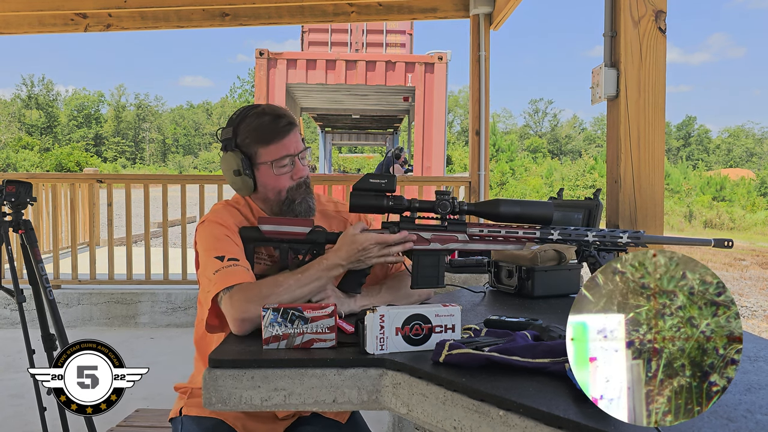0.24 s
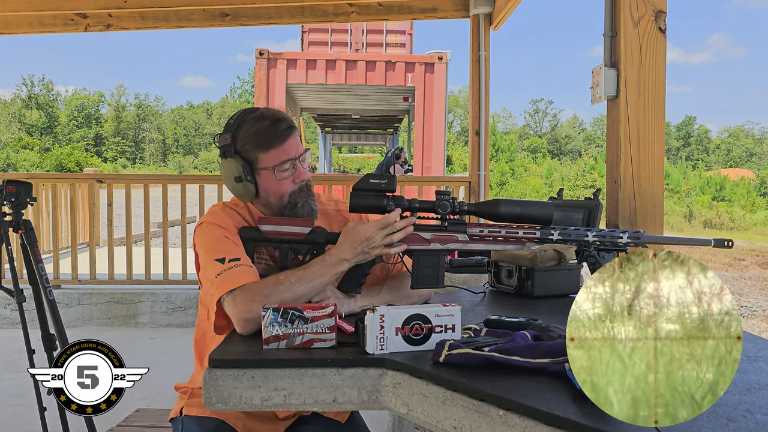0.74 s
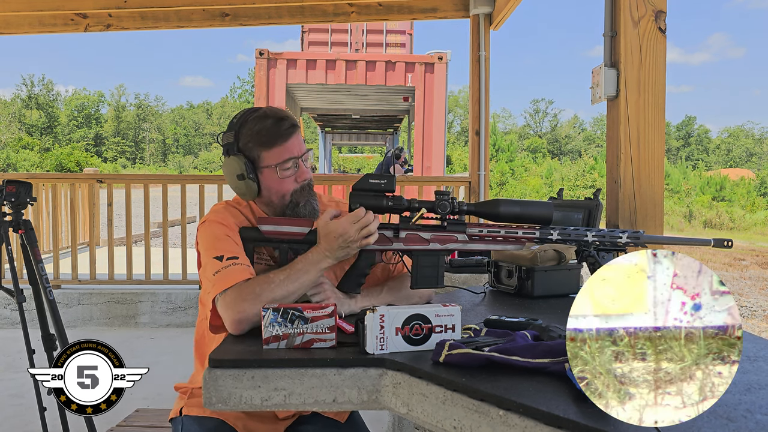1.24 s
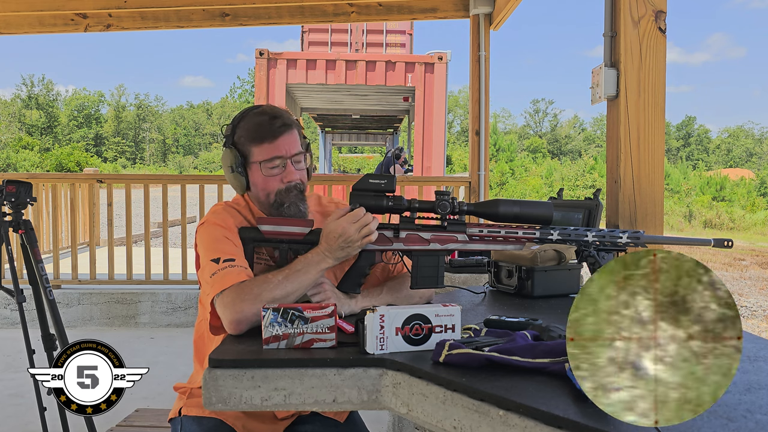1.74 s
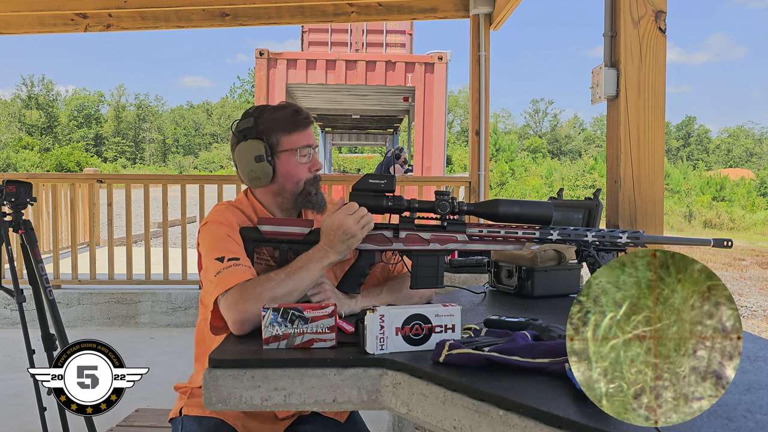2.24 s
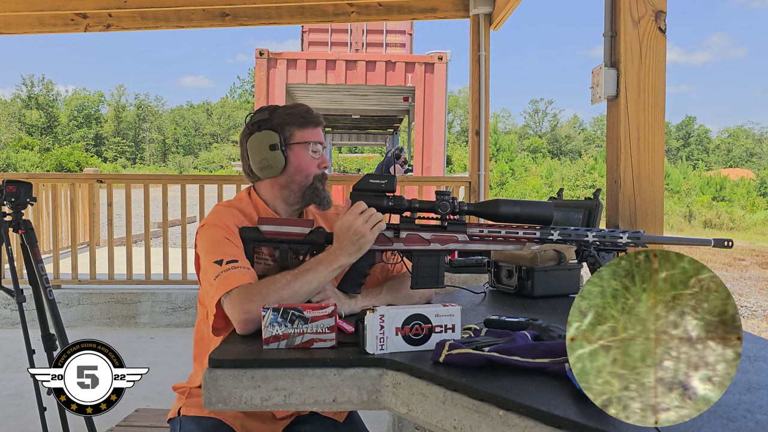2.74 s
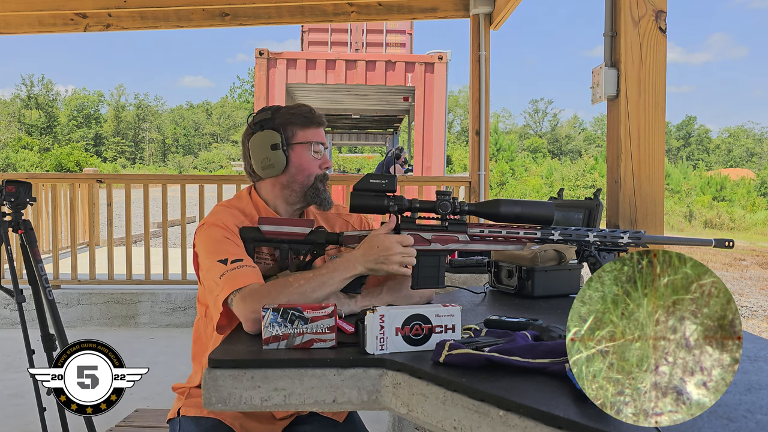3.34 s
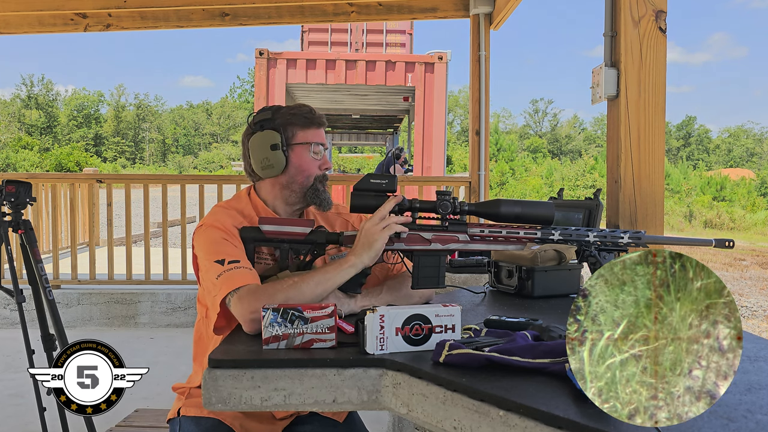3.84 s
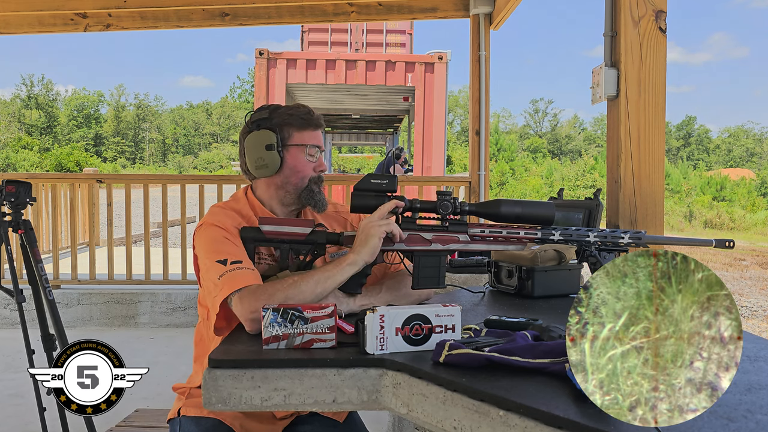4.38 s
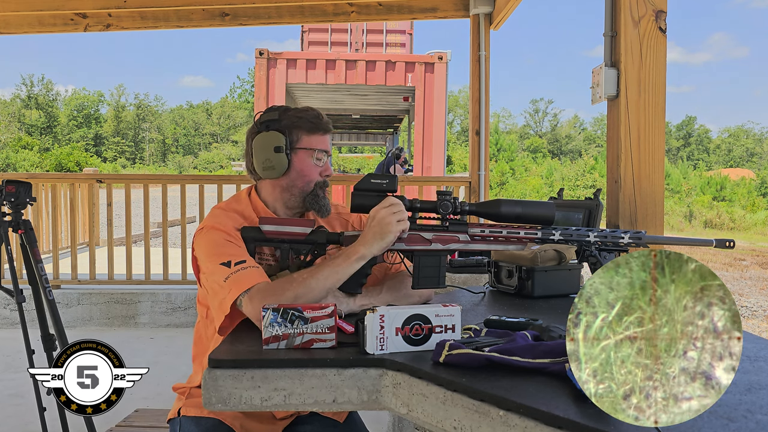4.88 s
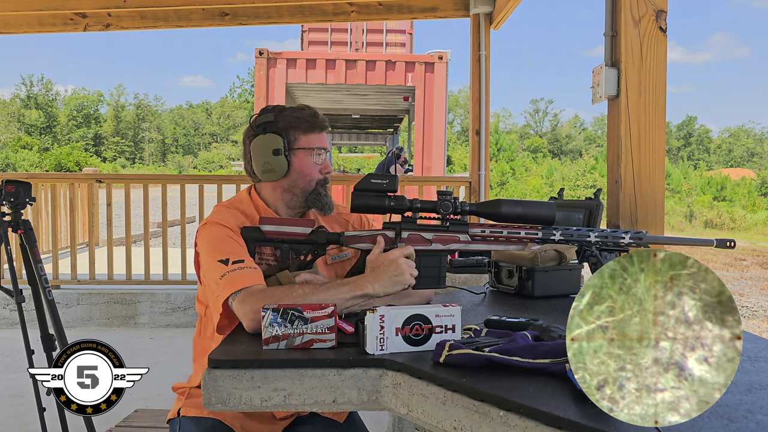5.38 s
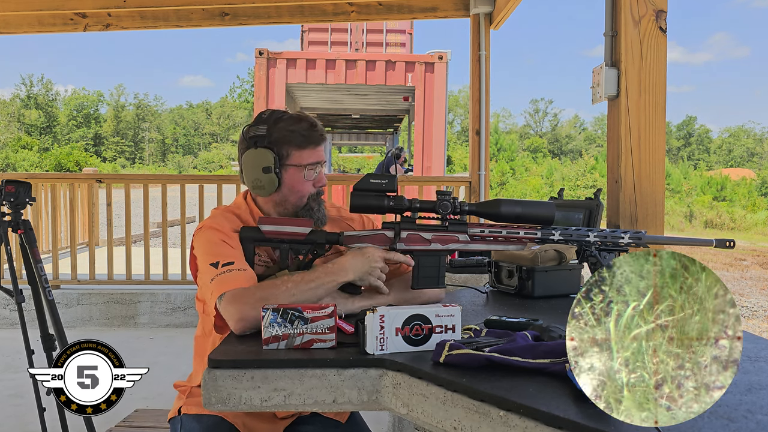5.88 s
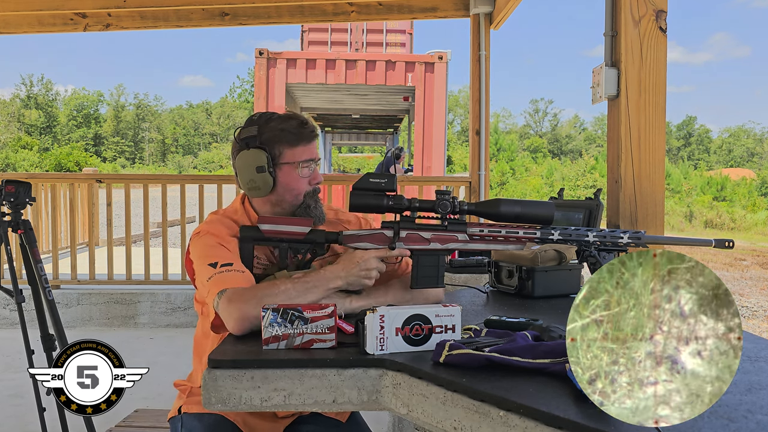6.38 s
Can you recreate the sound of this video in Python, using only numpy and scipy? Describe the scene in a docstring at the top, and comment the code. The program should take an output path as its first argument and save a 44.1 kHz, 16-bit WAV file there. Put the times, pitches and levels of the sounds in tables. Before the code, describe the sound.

A rifle bolt is worked in sharp metallic clacks and soft hand rustles at an outdoor range, then a loud shot cracks and echoes away.

```python
"""A rifle is worked by hand at a bench under a range shelter, heard close up and louder on the left.
Steel blows drive the modes of stock and small parts; slams, jolts and pings are decaying tones.
Hands and sleeves are grainy friction noise and cloth hiss; skin squeaks are gliding tones.
Just after the bolt is locked a shot goes off nearby: an N-wave, swelling scatter and echoing slaps.
Behind it lie still air and a dull distant roar that fades."""
import sys
import numpy as np
from scipy import signal
from scipy.fft import rfft, irfft, next_fast_len
from scipy.io import wavfile
from scipy.ndimage import uniform_filter1d

SR = 44100
rng = np.random.default_rng(int(sys.argv[2]) if len(sys.argv) > 2 else 0)


def master(y):
    """Save y as 16-bit WAV."""
    cut = np.clip(np.atleast_2d(y).T, -1, 1)
    pcm = np.round(cut * 32767)  # scale
    wavfile.write(sys.argv[1], SR, pcm.astype(np.int16))


N = 291655
TIME = np.arange(N) / SR

# Levels of sources are those ahead of the left-right balance.
# Steel on steel, from taking hold to the locked bolt:
# [t/s, clack level/dB, stock weight against clack/dB, hard edge against clack/dB, chatter t60/s]
STEEL_CONTACTS = [(0.213, -38.5, -8.5, -5, 0.025), (0.723, -20.5, -4.5, -11, 0.032),
                  (0.736, -16, -0.5, -7, 0.099), (1.233, -22, -7, -22.5, 0.055),
                  (1.241, -24.5, -11.5, -7, 0.029), (1.439, -34.5, 8.5, -13.5, 0.065),
                  (1.468, -31, -10, -13.5, 0.04), (2.021, -33.5, -23, 2.5, 0.22),
                  (2.211, -27.5, 4.5, -10.5, 0.098), (2.229, -21, 2, -13.5, 0.053),
                  (2.436, -37, -24, -7.5, 0.16), (2.612, -50.5, -10.5, 0.5, 0.46),
                  (2.633, -46, -23, -8.5, 0.068), (2.791, -32, -8.5, -7, 0.054),
                  (3.362, -28, -16.5, -5, 0.078), (3.379, -22, -2.5, -4, 0.15),
                  (3.42, -30, -18.5, -6, 0.078), (3.54, -19, -10.5, -11, 0.087),
                  (5.256, -29.5, -7, -29, 0.04), (5.2667, -18, -17, -22, 0.024),
                  (5.287, -29, -3, -7, 0.063), (5.333, -21.5, -0.5, -9, 0.096)]
# Hollow knocks of the magazine and receiver: [t/s, level/dB]
HOLLOW_KNOCKS = [(0.407, -22), (2.224, -21.5), (2.842, -35.5), (3.347, -17.5), (3.37, -18)]
# Modes of the rifle, from stock to small steel parts: [f/Hz, width/Hz, level/dB]
BODY_MODES = [(83.5, 17, -15), (157.7, 22, -1), (225, 44, 1.5), (265, 49, 0.5), (360.8, 47, -5),
              (418, 59, 1.5), (543, 110, 5.5), (694, 120, 2), (778, 120, -2), (894, 68, -3),
              (1026, 120, -5.5), (1391, 160, 2), (1697, 150, 0), (1938, 190, -1.5), (2340, 66, -4.5),
              (2563, 140, -2.5), (3446, 360, -11.5), (3980, 770, 2.5), (5240, 810, 3.5), (6400, 1300, -3.5),
              (7930, 1300, -1), (10920, 23000, -9), (15400, 470, -22)]
# Edges of the four registers thud, knock, clack and tick: [f/Hz]
REGISTER_EDGES = [40, 390, 1000, 3600, 17000]
# Delay with which each register answers, thud first in the list: [delay/s]
REGISTER_LAGS = [0.0033, 0.00098, .0005, 0.00019]
# Bolt slammed into a stop: [t/s, level/dB, f/Hz]
BOLT_SLAMS = [(3.363, -2, 1790), (3.4224, -6.5, 1930), (3.5404, -5.5, 1840), (5.3334, -3, 694)]
# The stock knocks against shoulder or bench, or takes a heavy blow, and jolts as a whole: [t/s, level ahead of
# filter/dB, f/Hz, t60/s]
STOCK_JOLTS = [(2.2328, -7, 161.2, 0.051), (5.336, -24.5, 84, 0.15)]
# Fingers and palm on the stock and the scope: [t/s, thud level/dB, click level/dB]
HAND_TAPS = [(0.288, -42, -39), (0.578, -55, -43), (0.684, -50, -50), (0.842, -41.5, -37),
             (0.986, -39.5, -43.5), (1.042, -37.5, -36.5), (1.137, -37.5, -34.5), (1.335, -45, -39.5),
             (2.74, -34.5, -43), (3.023, -42.5, -55.5), (3.074, -45, -71.5), (3.166, -82, -66.5),
             (3.868, -51, -85), (3.91, -61, -53), (3.991, -85, -52.5), (4.112, -44, -44.5),
             (4.48, -85, -62), (4.51, -82, -62.5), (4.551, -87.5, -66), (4.804, -55.5, -71.5),
             (4.968, -59, -43.5), (5.084, -64, -51), (5.202, -48.5, -40)]
# Blows that leave the bolt ringing:
# [t/s, low pair level/dB, middle pair level/dB, high pair level/dB, t60 ahead of each pair's share/s]
BOLT_PINGS = [(1.235, -55.5, -22, -34, 0.083), (1.472, -67, -33.5, -37, 0.24),
              (2.021, -60, -24.5, -20, 0.31), (2.437, -34.5, -38, -32, 0.34),
              (2.611, -42, -45.5, -43, 0.32), (2.743, -60, -48, -38, 0.28)]
# Close pairs of bolt modes that beat: [f/Hz, partner f/Hz, share of the t60]
BOLT_MODE_PAIRS = [(1470, 1346, .85), (10008, 10068, .8), (15520, 15440, 1)]
# Loose parts caught by a blow: [t/s, f/Hz, level/dB, t60/s]
LOOSE_CLINKS = [(0.112, 1330, -35.5, 0.035), (0.7242, 1500, -12, 0.018), (1.468, 2560, -7, 0.022),
                (2.0216, 1120, -23.5, 0.094), (2.212, 630, -13, 0.036), (3.378, 1830, -5.5, 0.059),
                (3.53, 1763, -10.5, 0.03), (4.702, 3500, -49, 0.032), (5.268, 1475, -3, 0.039),
                (5.27, 4830, -11.5, 0.018)]
# Skin on metal, one curve for each squeak: [t/s, f/Hz, level/dB]
SKIN_SQUEAKS = [
    [(1.202, 4150, -41.5), (1.211, 3280, -37), (1.232, 3500, -48)],
    [(1.27, 1230, -37), (1.292, 1077, -46), (1.31, 1264, -38), (1.34, 1470, -40)],
]
# Pitch jitter of each squeak; the first rasps, the second is nearly clean: [rms share of f]
SKIN_JITTER = (0.16, 0.05)
# Hand or bolt sliding:
# [start t/s, length/s, scraping level/dB, centre f/Hz, bumping against scraping/dB]
SLIDE_STROKES = [(0.174, 0.031, -36.5, 2570, -4), (0.29, 0.13, -43, 2290, 4),
                 (0.429, 0.17, -47, 2138, -0.5), (1.018, 0.074, -46.5, 1736, -7),
                 (1.196, 0.035, -45.5, 1683, -17), (1.425, 0.015, -30.5, 2569, -18),
                 (2.172, 0.037, -37.5, 1800, 0), (2.279, 0.085, -58.5, 2260, 6),
                 (2.732, 0.09, -48.5, 1900, 1.5), (2.858, 0.046, -46, 1807, -4.5),
                 (2.998, 0.061, -64, 1710, 4), (3.294, 0.055, -33.5, 1807, -10.5),
                 (3.328, 0.12, -26.5, 1702, -30), (3.48, 0.08, -27.5, 1834, -12),
                 (4.097, 0.16, -59.5, 2150, -4.5), (4.245, 0.087, -39.5, 2202, -21),
                 (4.367, 0.054, -50, 1783, -16.5), (4.601, 0.32, -69, 2113, 1.5),
                 (5.066, 0.032, -51, 1800, -6.5), (5.137, 0.19, -52.5, 2072, 9),
                 (5.262, 0.14, -43.5, 1632, 6.5), (5.434, 0.13, -62, 1900, 3)]
# Low bumping under the slides: [f/Hz, relative level/dB]
BUMP_SPECTRUM = [(25, -35), (65, 4.5), (150, 0.5), (550, -34.5)]
# Sleeve swishing as the arm moves: [start t/s, length/s, level/dB]
SLEEVE_SWISHES = [(0.176, 0.025, -42.5), (0.263, 0.096, -44.5), (0.393, 0.19, -52), (0.744, 0.065, -41),
                  (3.331, 0.05, -32.5), (4.261, 0.033, -55), (5.235, 0.13, -47)]
# Cloth hiss: [f/Hz, relative level/dB]
CLOTH_SPECTRUM = [(1500, -9.5), (3000, 4.5), (4500, 4.5), (15500, -11), (17000, -27.5)]
# Dry scrapes with a pitch of their own: [start t/s, length/s, level/dB, centre f/Hz, width/Hz]
PITCHED_SCRAPES = [(0.0, 0.13, -49.5, 3250, 1100), (0.313, 0.26, -45, 2430, 450),
                   (3.575, 0.072, -58.5, 3800, 4500)]
# Ground and shelter, berms, nearest trees, tree line scattering the shot; silent ahead of the shot:
# [start t/s, rise/s, length from start/s, t60/s, roar level/dB, crackle level/dB]
SHOT_SCATTER = [(5.513, 0.0037, 0.041, 0.56, -12.5, -18), (5.802, 0.062, 0.052, 0.64, -31, -37),
                (6.07, 0.044, 0.037, 0.31, -49.5, -35.5), (6.191, 0.14, 0.24, 1, -54, -39.5)]
# Low roar of the scatter: [f/Hz, relative level/dB]
ROAR_SPECTRUM = [(30, -46), (130, -10.5), (250, -8.5), (430, -1), (2800, -11.5), (3800, -27.5), (6000, -56)]
# Crackle of the scatter: [f/Hz, relative level/dB]
CRACKLE_SPECTRUM = [(250, -9.5), (500, -0.5), (800, -6), (1100, 3), (2000, -14.5), (3400, -23.5),
                    (4400, -53)]
# Treble sizzle on the roar: [f/Hz, relative level/dB]
SIZZLE_SPECTRUM = [(2500, 1), (6000, -3), (9000, -7.5), (15300, -16.5), (16500, -37)]
# Single slaps of the echo: [t/s, peak level/dB]
ECHO_SLAPS = [(5.82, -19.5), (5.862, -15.5), (5.888, -25), (5.917, -17.5), (6.118, -36), (6.22, -23.5),
              (6.253, -17), (6.262, -27.5), (6.274, -19.5), (6.288, -27), (6.34, -20), (6.407, -19.5),
              (6.446, -29), (6.5, -21.5), (6.585, -21)]
# Still air: [f/Hz, relative level/dB]
AIR_SPECTRUM = [(25, -23.5), (70, -6), (450, -4.5), (800, -11), (1500, -23), (3000, -22.5), (15000, -35.5)]
# Dull distant roar: [f/Hz, relative level/dB]
FAR_ROAR_SPECTRUM = [(60, -19.5), (430, 1.5), (6000, -62.5)]

HAND_DAMPS_S, HAND_T60_S = 0.11, 0.2  # the hand damps ringing parts from this age on
STROKE_RISE_S, STROKE_T60_S = 0.025, 0.16
FRICTION_HZ = 2000  # centre of the friction sound before each stroke shifts it
SHOT_S = 5.5572


def contacts():
    """Weight brings out the stock, a hard edge the small parts; hollow knocks share one colour."""
    out = np.zeros(N)
    for s, db, weight_db, edge_db, t60 in STEEL_CONTACTS:
        # the knock stays about 8 dB below the clack and varies slightly with the weight
        balance_db = np.array([weight_db, -8 + 0.11 * weight_db, 0, edge_db])
        out += strike(s, db + balance_db, t60)
    hollow_db = np.array([-17.5, 1.5, -8.5, -23.5])  # thud, knock, clack, tick
    for s, db in HOLLOW_KNOCKS:
        out += strike(s, db + hollow_db, chatter_t60=0.074)
    return out


def strike(s, levels_db, chatter_t60, ring_on_db=-27.0, ring_on_t60=0.25, snap_db=-8.0, snap_t60=0.0012):
    """A blow snaps, chatters and drives the modes as it dies away; the heavy stock answers last."""
    out = np.zeros(N)
    t = TIME[:SR // 3]
    snap = from_db(snap_db - 60 * t / snap_t60)
    chatter = from_db(-60 * t / chatter_t60)
    ring_on = from_db(ring_on_db - 60 * t / ring_on_t60)
    registers = zip(REGISTER_LAGS, levels_db, REGISTER_EDGES, REGISTER_EDGES[1:])
    for lag, level_db, low, high in registers:
        force = grainy(len(t), rough_db=1.5, per_s=540) * (snap + chatter + ring_on)
        add(out, s + lag, from_db(level_db) * rifle_body(force, low, high))
    return out


def rifle_body(force, low_hz, high_hz, spread_db=4.0):
    """Resonant modes of one register answer a force, with strengths scattered by spread_db."""
    body = np.zeros(len(force))
    modes = [mode for mode in BODY_MODES if low_hz <= mode[0] < high_hz]
    for k, (hz, width_hz, db) in enumerate(modes):
        strength = from_db(db + spread_db * rng.normal())
        body += (-1) ** k * strength * resonate(force, hz, width_hz)
    body = band(body, low_hz * .8, high_hz * 1.1, order=4)
    # same energy as 20 ms at rms 1
    return body * np.sqrt(SR / 50 / np.sum(body ** 2))


def slams(cycles=8.0):
    """Steel stopped dead: a tone at full strength at once, 60 dB down after a few cycles."""
    out = np.zeros(N)
    t = TIME[:SR // 20]
    for s, db, hz in BOLT_SLAMS:
        add(out, s, from_db(db - 60 * t * hz / cycles) * np.sin(2 * np.pi * hz * t))
    return out


def jolts(partner_ratio=1.35):
    """Two low stock modes swing together and die away."""
    out = np.zeros(N)
    t = TIME[:SR // 5]
    for s, db, hz, t60 in STOCK_JOLTS:
        tones = np.sin(2 * np.pi * hz * t) + .5 * np.sin(2 * np.pi * partner_ratio * hz * t)
        swing = from_db(db - 60 * t / t60) * tones
        add(out, s, band(swing, .6 * hz, 900))
    return out


def taps(rise_s=0.013, t60=0.053, nail_db=13.5, skin_hz=3070.0):
    """A palm lands softly and lingers; the more a tap is fingernail, the crisper it is."""
    out = np.zeros(N)
    t = TIME[:SR // 5]
    for s, thud_db, click_db in HAND_TAPS:
        # share of soft flesh, which stretches both rise and decay
        flesh = np.clip(1 + (thud_db - click_db) / nail_db, .3, 1)
        envelope = np.minimum(t / (rise_s * flesh), 1) * from_db(-60 * t / (t60 * flesh))
        force = grainy(len(t), rough_db=4.0, per_s=380) * envelope
        add(out, s, from_db(thud_db) * rifle_body(force, *REGISTER_EDGES[:2]))
        add(out, s, from_db(click_db) * rifle_body(force, REGISTER_EDGES[1], skin_hz))
    return out


def pings():
    """Blows leave paired bolt modes ringing, a thin part tinkling and loose parts clinking."""
    out = np.zeros(N)
    for s, *levels_db, t60 in BOLT_PINGS:
        for (hz, partner_hz, share), db in zip(BOLT_MODE_PAIRS, levels_db):
            add(out, s, ping(hz, partner_hz, db, t60 * share))
    # a thin metal part tinkles as the bolt runs forward
    add(out, 3.382, ping(hz=13600, partner_hz=13645, db=-17.5, t60=0.1))
    for s, hz, db, t60 in LOOSE_CLINKS:
        add(out, s, ping(hz, hz, db, t60, shimmer_width_hz=330))
    return out


def ping(hz, partner_hz, db, t60, shimmer_width_hz=110.0):
    """Thin metal decays and is damped by the hand; unlike pairs beat, the loose fit shimmers."""
    t = TIME[:SR // 2]
    tone = np.sin(2 * np.pi * hz * t) + np.sin(2 * np.pi * (partner_hz * t + rng.random()))
    rattle = grainy(len(t), rough_db=6.0, per_s=140)
    loose = rms_one(resonate_twice(rattle, hz, shimmer_width_hz))
    damping = swell(0, 1 / SR, HAND_DAMPS_S, HAND_T60_S)[:len(t)]
    return from_db(db - 60 * t / t60) * damping * (.35 * tone + .62 * loose)


def squeak(jitter, curve):
    """Skin on metal gives a short gliding tone; the more its pitch jitters, the more it rasps."""
    hz, db = in_time(curve)
    waver = 1 + jitter * rms_one(uniform_filter1d(rng.standard_normal(N), size=20))
    contact = 1. * (TIME > curve[0][0]) * (TIME < curve[-1][0])
    touching = uniform_filter1d(contact, size=SR // 500)  # softened over 2 ms
    return touching * from_db(db) * np.sin(2 * np.pi * np.cumsum(hz * waver) / SR)


def rubbing():
    """Strokes shift the pitch of wandering stick-slip friction on the rifle; cloth adds hiss."""
    steel = friction()
    # reading the friction sound at an uneven speed makes its pitch wander
    wander = rms_one(uniform_filter1d(rng.standard_normal(N), size=2500))
    travel = np.cumsum(1 + .06 * wander)
    bumping = from_db(-1.5) * coloured(BUMP_SPECTRUM, rough_db=3.5, per_s=72)
    slides = np.zeros(N)
    for s, length, db, hz, bump_db in SLIDE_STROKES:
        scraping = np.interp(travel * hz / FRICTION_HZ % N, np.arange(N), steel)
        stroke = swell(s, STROKE_RISE_S, length, STROKE_T60_S)
        slides += from_db(db) * stroke * (scraping + from_db(bump_db) * bumping)
    swish = sum(from_db(db) * swell(s, 0.039, length, t60=0.25) for s, length, db in SLEEVE_SWISHES)
    return slides + swish * coloured(CLOTH_SPECTRUM, rough_db=2.0, per_s=170)


def friction(knock_db=9.0, grit_db=-16.0, focus_width_hz=2700.0):
    """Uneven slips drive the upper three registers, focused by a broad resonance; rms 1."""
    slips = grainy(N, rough_db=4.5, per_s=300)
    upper_registers = zip(REGISTER_EDGES[1:], REGISTER_EDGES[2:])
    knock, clack, grit = [rms_one(rifle_body(slips, low, high, spread_db=0)) for low, high in upper_registers]
    steel = from_db(knock_db) * knock + clack + from_db(grit_db) * band(grit, 3000, 7000)
    return rms_one(resonate_twice(steel, FRICTION_HZ, focus_width_hz))


def scrapes():
    """Coarse slips excite a single resonance."""
    slips = grainy(N, rough_db=1.5, per_s=200)
    out = np.zeros(N)
    for s, length, db, hz, width_hz in PITCHED_SCRAPES:
        stroke = swell(s, STROKE_RISE_S, length, STROKE_T60_S)
        out += from_db(db) * stroke * rms_one(resonate_twice(slips, hz, width_hz))
    return out


def shelter(x, t60=0.095, wet_db=-22.4897, first_s=0.0025, low_hz=250., high_hz=11100.0):
    """Roof and concrete floor give a short, thin reverberation: decaying noise as the response."""
    t = TIME[:SR // 2]
    noise = band(rng.standard_normal(len(t)), low_hz, high_hz, order=1)
    response = noise * from_db(-60 * t / t60) * (t > first_s)
    response = response / np.sqrt(np.sum(response ** 2))
    return from_db(wet_db) * signal.fftconvolve(x, response)[:N]


def shot(build_s=0.016):
    """The muzzle blast, then dense scatter from ground and berms and sparser from the trees."""
    roar = sum(from_db(db) * swell(*shape) for *shape, db, _ in SHOT_SCATTER)
    crackle = sum(from_db(db) * swell(*shape) for *shape, _, db in SHOT_SCATTER)
    # the sizzle follows the roar, then dies away quickly about half a second after the shot
    sizzle = from_db(-9.5) * roar * swell(SHOT_S, 1 / SR, length_s=0.518, t60=0.11)
    # the berms return a gritty rasp of treble
    rasp = rms_one(band(grainy(N, rough_db=3.0, per_s=210), 1870.0, 3900.0))
    rasp_swell = from_db(-38.5) * swell(start_s=5.74, rise_s=0.016, length_s=0.18, t60=0.5)
    scatter = (roar * coloured(ROAR_SPECTRUM, rough_db=3.5, per_s=130)
               + crackle * coloured(CRACKLE_SPECTRUM, rough_db=5.5, per_s=900)
               + sizzle * coloured(SIZZLE_SPECTRUM, rough_db=1.5, per_s=290)
               + rasp_swell * rasp)
    out = scatter * np.clip((TIME - SHOT_S) / build_s, 0, 1) ** .5
    blast = from_db(1) * shock(length_s=0.00092)
    add(out, SHOT_S, band(blast, 170.0, 1440.0))
    return out


def shock(length_s):
    """An N-shaped pressure wave followed by silence."""
    t = TIME[:SR // 20]
    return (2 * t / length_s - 1) * (t < length_s)


def echoes(length_s=0.0007, low_hz=696.0, high_hz=1509.0, scatter=0.67, scatter_t60=0.063):
    """Far obstacles return the blast as slaps with only the middle pitches left."""
    out = np.zeros(N)
    for s, db in ECHO_SLAPS:
        wave = shock(length_s)
        tail = rng.standard_normal(len(wave)) * from_db(-60 * TIME[:len(wave)] / scatter_t60)
        slap = band(wave + scatter * tail, low_hz, high_hz, order=3)
        add(out, s, from_db(db) * slap / np.abs(slap).max())
    return out


def background():
    """Still air as steady noise, and a dull roar that fades in the distance."""
    air = from_db(-77.5) * coloured(AIR_SPECTRUM)
    fading = from_db(-53) * swell(0, 1 / SR, length_s=0.55, t60=3.8)
    return air + fading * coloured(FAR_ROAR_SPECTRUM, rough_db=-0.5, per_s=31)


def from_db(db):
    """Amplitude factor of a level."""
    return 10 ** (np.asarray(db) / 20)


def rms_one(x):
    """Scale a signal to rms 1."""
    return x / np.sqrt(np.mean(x ** 2) + 1e-20)


def add(track, s, sound):
    """Mix a sound into a track from time s on."""
    start = int(s * SR)
    track[start:start + len(sound)] += sound[:N - start]


def in_time(rows):
    """The columns of a curve, sample by sample."""
    s, *columns = np.transpose(rows)
    return [np.interp(TIME, s, column) for column in columns]


def swell(start_s, rise_s, length_s, t60):
    """Rise, hold until the length since the start is over, then die away."""
    t = TIME - start_s
    return np.clip(t / rise_s, 0, 1) * from_db(-60 * np.clip((t - length_s) / t60, 0, 2))


def resonate(x, hz, width_hz):
    """Two-pole resonance with gain 1 on top."""
    r = np.exp(-np.pi * width_hz / SR)
    zeros = np.array([1, 0, -1]) * (1 - r * r) / 2
    poles = [1, -2 * r * np.cos(2 * np.pi * hz / SR), r * r]
    return signal.lfilter(zeros, poles, x)


def resonate_twice(x, hz, width_hz):
    """The same resonance twice in a row, for steeper flanks."""
    return resonate(resonate(x, hz, width_hz), hz, width_hz)


def band(x, low_hz, high_hz, order=2):
    """Keep the pitches between two edges."""
    edges = [low_hz, min(high_hz, SR / 2 - 1000)]
    return signal.sosfilt(signal.butter(order, edges, "band", fs=SR, output="sos"), x)


def grainy(size, rough_db, per_s):
    """Noise whose strength jumps about, as surfaces catch and slip."""
    knots = rng.standard_normal(size // 20 + 2)
    grip = np.interp(np.arange(size) * per_s / SR, np.arange(len(knots)), np.clip(knots, -2, 2))
    return rng.standard_normal(size) * from_db(rough_db * grip)


def coloured(spectrum, rough_db=0, per_s=100):
    """Grainy noise with the given spectrum; rms 1."""
    hz, db = np.transpose(spectrum)
    size = next_fast_len(N)
    bins_hz = np.arange(size // 2 + 1) * SR / size
    gain = from_db(np.interp(np.log(bins_hz + 1), np.log(hz), db))
    return rms_one(irfft(rfft(grainy(N, rough_db, per_s), size) * gain, size)[:N])


def scene(treble_width=.1, left_db=6.0):
    """All is heard from one close point, louder on the left; only delayed treble spreads a little."""
    rifle = contacts() + slams() + jolts() + taps() + pings()
    rifle = rifle + sum(map(squeak, SKIN_JITTER, SKIN_SQUEAKS))
    mid = rifle + shelter(rifle) + rubbing() + scrapes() + shot() + echoes() + background()
    side = treble_width * np.roll(band(mid, 4000., 16000., order=4), SR // 300)
    pan = from_db(np.array([[left_db], [0]]))  # left against right
    return mid * pan / pan.mean() + side * [[1], [-1]]


def record(dry):
    """The highest peaks are rounded off and the top is cut."""
    rounded = dry / (1 + dry ** 6) ** (1 / 6)
    top_cut = signal.ellip(10, .1, 90, 16300, fs=SR, output="sos")  # low-pass edge in Hz
    return signal.sosfilt(top_cut, rounded)


dry = scene()
out = record(dry)
master(out)
```